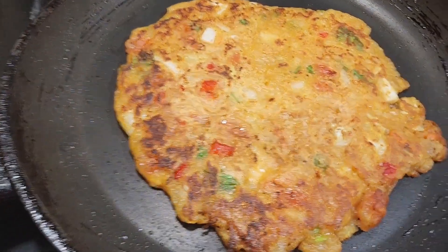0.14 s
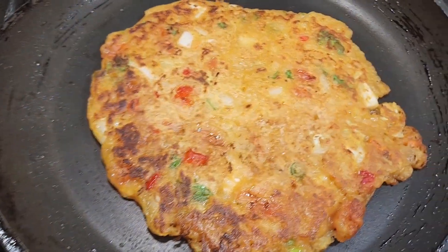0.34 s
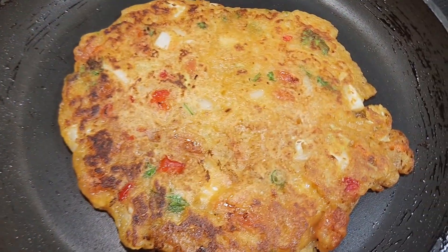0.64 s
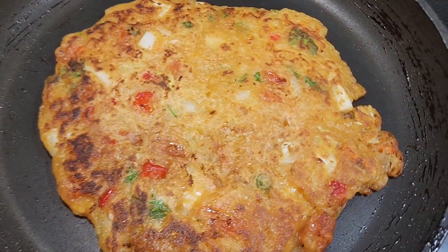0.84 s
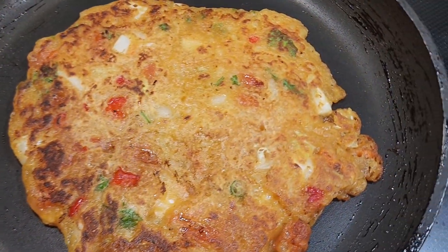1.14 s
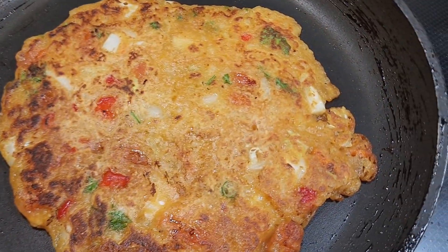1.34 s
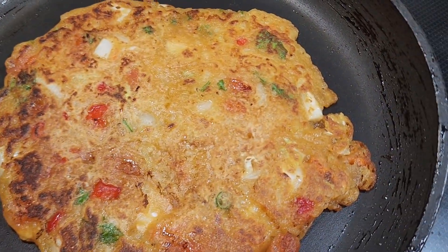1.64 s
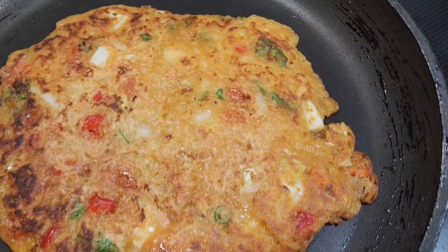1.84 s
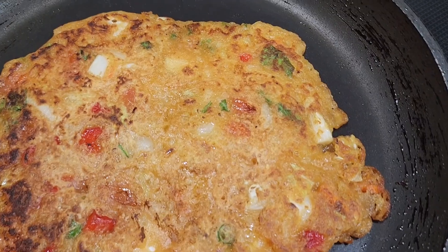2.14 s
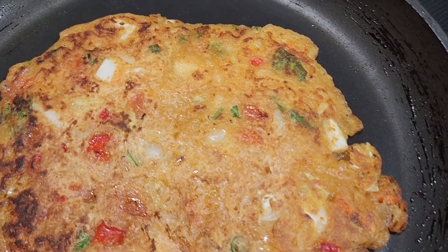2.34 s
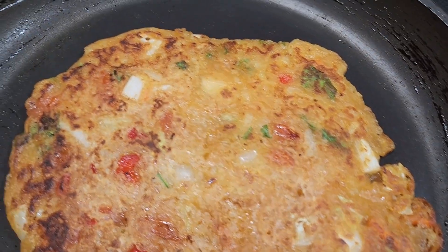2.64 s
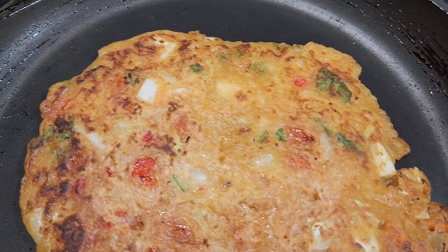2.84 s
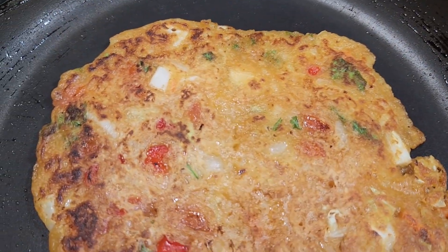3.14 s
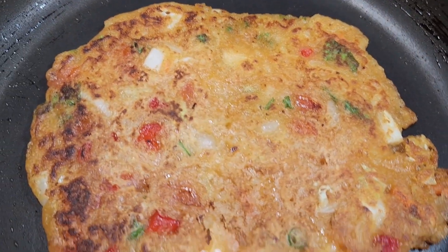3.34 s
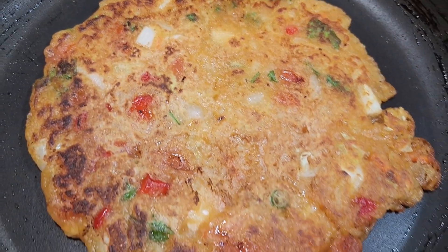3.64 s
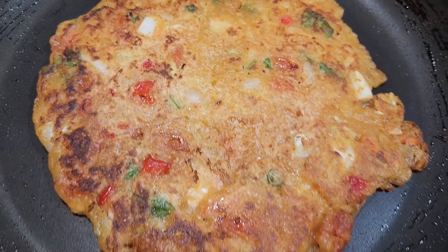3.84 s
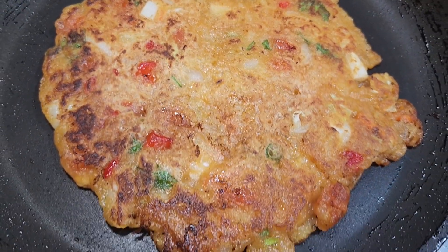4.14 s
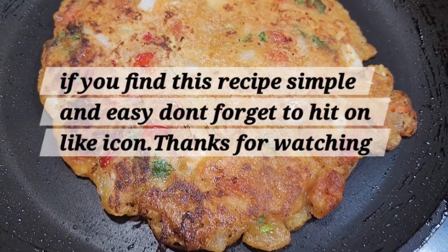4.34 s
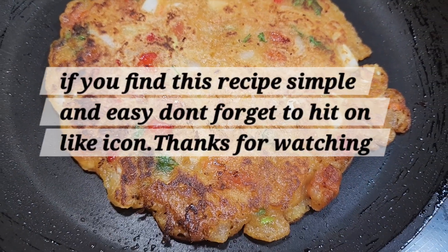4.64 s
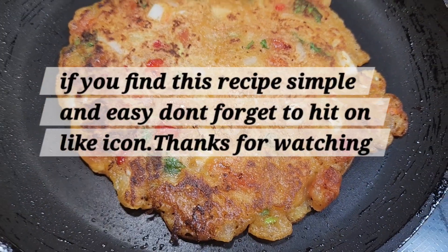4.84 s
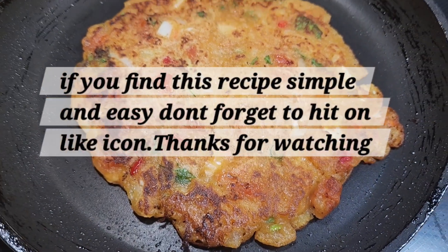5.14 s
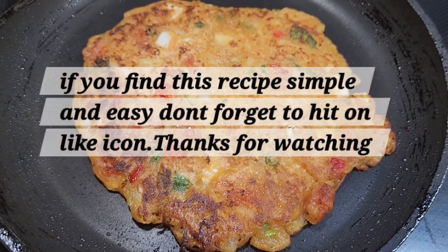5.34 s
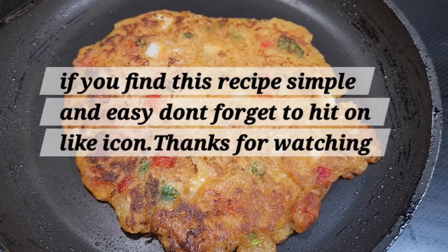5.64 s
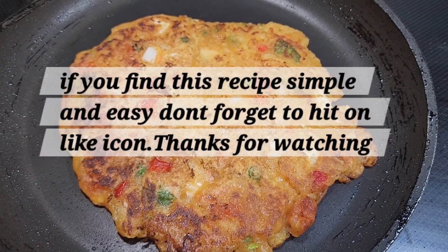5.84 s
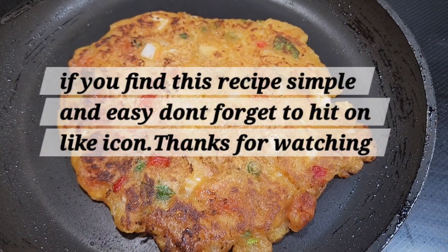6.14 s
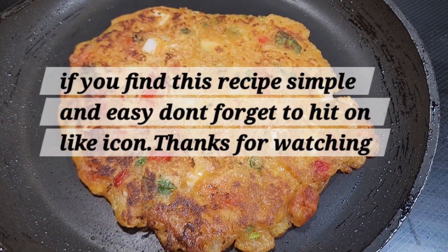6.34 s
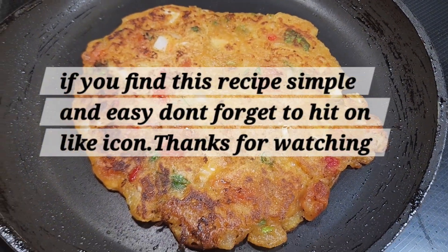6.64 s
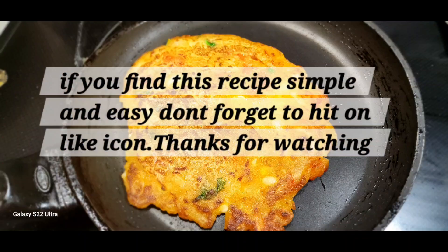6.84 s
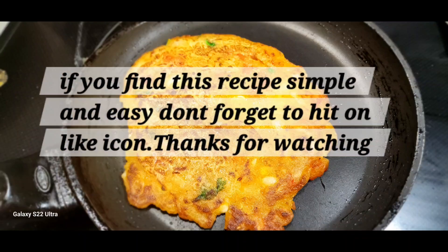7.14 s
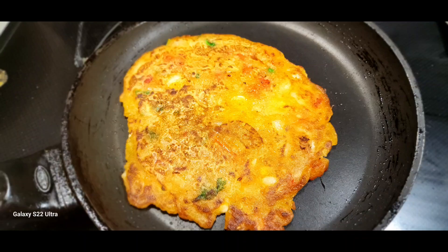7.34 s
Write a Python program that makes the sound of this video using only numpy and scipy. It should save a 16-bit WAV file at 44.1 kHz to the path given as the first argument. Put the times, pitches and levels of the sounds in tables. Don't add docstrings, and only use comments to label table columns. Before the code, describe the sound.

A pancake sizzles softly in a frying pan, an early flurry of sharp crackling pops on the left, over a low extractor fan hum.

```python
import sys
import numpy as np
from scipy import signal
from scipy.fft import rfft, irfft, next_fast_len
from scipy.io import wavfile
from scipy.ndimage import uniform_filter1d, minimum_filter1d, map_coordinates

SR = 44100
rng = np.random.default_rng(int(sys.argv[2]) if len(sys.argv) > 2 else 0)


def field_ratio(decibels):
    return 10 ** (np.asarray(decibels, dtype=float) / 20)


def waveform_to_disk(signal):
    frames = np.transpose(np.atleast_2d(signal))
    scaled = np.clip(frames, -1, 1) * 32767
    samples = np.round(scaled).astype(np.int16)
    wavfile.write(sys.argv[1], SR, samples)


N = 330740

# pitch_hz, level_db, unsteadiness_db
FAN_TONES = [
    (92.7, -36.5, 0.5),
    (120.15, -39.5, 1),
]
# freq_hz, level_db (per Hz)
AIR_RUSH = [(20, -32.5), (35, -13), (60, -9.5), (80, -1), (150, -2.5), (300, -6), (600, -19), (800, -23),
            (1600, -21.5), (2500, -28.5), (5000, -37), (9000, -87.5)]
# centre_hz, width_hz, lift_db
HOOD_MODES = [(178.5, 15, 4), (254, 28, 6), (392, 28, 9), (516, 39, 9), (676.5, 65, 7), (947, 71, 6),
              (1267, 55, 7.5), (1472, 33, 5.5)]
# freq_hz, correlation (no unit)
AIR_LIKENESS = [(60, 1.0), (130, 0.98), (290, 0.97), (640, 0.73), (1410, 0.36), (3100, 0.07), (6820, -1.2),
                (15000, -0.01)]
# freq_hz, left_minus_right_db
AIR_BALANCE = [(60, 3), (110, 0), (200, -0.5), (380, 3), (700, 3), (1290, -2), (2380, 7), (4400, 7.5),
               (8120, -3.5), (15000, 12)]
# start_s, fizz_level_db, small_spits_per_s, left_minus_right_db
FRYING = [(0.0, -47, 5, 1), (0.13, -46, 8.3, 4), (0.24, -42.5, 40.6, 5), (0.46, -41.5, 92, 10.5),
          (0.62, -43, 60, 10), (0.77, -43, 35, 8.5), (1.38, -45, 17, 10.5), (1.67, -43.5, 12, 8),
          (2.5, -45, 14, 7.5), (4.12, -45, 7.15, 6.5), (5.06, -46.5, 7, 5), (5.5, -45, 6, 4),
          (5.75, -43, 4, 0), (5.85, -45.5, 10, 8), (6.38, -44.5, 19.4, 4), (6.6, -45.5, 8, 5.5)]
# freq_hz, level_db (per Hz)
FRYING_COLOUR = [(880, -18), (1500, -6.5), (1620, -0.5), (1770, -9), (2260, -6), (2830, -6), (3270, -5.5),
                 (3710, -4), (5220, -7.5), (7640, -5.5), (9740, -8.5), (11800, -3.5), (15400, -5)]
# freq_hz, left_minus_right_db
PORT_DIFFERENCE = [(1500, 1.5), (2400, 2), (4400, -1), (6000, -2), (7500, -6), (8800, -1), (12000, 1.5),
                   (15000, 3.5)]
# start_s, level_db, t60_s, cavity_hz, opening_kick_db
STEAM_SPURTS = [
    (5.5822, -31.5, 0.26, 2930, 8.5),
    (5.7014, -29.5, 0.14, 3820, 3),
    (5.7135, -32.5, .1, 3650, 3.5),
]
# start_s, bright_db, body_db
RIM_POPS = [(0.1949, -27, -31), (0.2535, -25, -32), (0.261, -14, -29), (0.3122, -30, -28),
            (0.3208, -21, -34), (0.3484, -22, -29), (0.3862, -28, -30), (0.3955, -20, -28),
            (0.4094, -22, -28), (0.4195, -22, -36), (0.4367, -15.5, -31), (0.451, -19, -34),
            (0.46, -21, -31), (0.478, -16, -24.5), (0.4848, -33, -30), (0.4995, -16.5, -24),
            (0.5119, -20, -30), (0.5234, -21, -24), (0.536, -24, -25.5), (0.569, -22, -29),
            (0.5811, -34.5, -26), (0.5984, -16, -23), (0.604, -31, -34), (0.6189, -20, -28),
            (0.645, -28, -28.5), (0.659, -24.5, -42), (0.681, -27, -30),
            (0.8186, -21, -26.5), (0.8503, -29.5, -31), (0.907, -15, -20), (0.923, -19, -25),
                  (1.0273, -29, -30), (1.066, -22, -32), (1.179, -23, -24.5), (1.2016, -39, -31),
                  (1.2253, -42, -30), (1.2606, -15.5, -18.5), (1.2823, -25, -37), (1.339, -32, -34),
                  (1.3568, -19, -32), (1.37, -29.5, -31), (1.3772, -32, -33), (1.617, -24, -29.5),
                  (2.111, -34.5, -29), (2.1268, -39, -31), (2.2646, -34, -31), (2.2744, -24.5, -36),
                  (2.4565, -27, -32), (2.6618, -32, -37), (2.8216, -27, -28.5), (2.873, -30, -32),
                  (2.949, -22, -28), (3.1086, -18.5, -28.5), (3.717, -24, -28.5), (5.1662, -26, -34),
                  (5.3107, -22.5, -44), (6.271, -28, -45)]
# start_s, bright_db, body_db, cavity_hz
BELOW_POPS = [(1.596, -48, -37, 2198), (2.1712, -34, -34, 4200), (2.336, -30, -28, 5500),
              (2.6009, -28.5, -31, 4197), (4.69, -30, -37, 2400), (4.8424, -33, -32, 4490),
              (4.948, -30, -38, 2398), (5.3781, -22.5, -37, 3202), (5.5544, -26, -27.5, 2600),
              (5.6371, -22, -15, 1994), (5.6481, -21.5, -25, 2984), (5.8418, -30, -42, 4890),
              (5.851, -38, -34.5, 2904), (5.896, -32, -28, 4200), (6.018, -39, -31, 3800),
              (6.0452, -22.5, -28.5, 4000), (6.322, -33, -30.5, 3900), (6.358, -32.5, -40.5, 2500),
              (6.445, -33, -29, 3000), (6.5664, -35.5, -36.5, 2100), (6.5973, -36, -38, 3400),
              (6.7648, -25, -27, 2505)]
SIDES = np.array([[.5], [-.5]])
# freq_hz, margin_db
LEFT_DROPOUT = [(1500, 40), (2500, 8), (4000, 4.8), (5300, 3.5), (7000, 4.3), (9000, 7), (15540, 9),
                (15590, -5)]
# freq_hz, margin_db
RIGHT_DROPOUT = [(1500, 40), (2500, 5), (4000, 3.4), (7500, 4.2), (8800, 2.2), (10000, 3.8), (15540, 5.5),
                 (15590, -5)]
# freq_hz, gain_db
BAND_LIMIT = [(15450, 0), (15560, -3), (15850, -6), (15950, -13), (16700, -21), (16800, -70)]

FAN_DB = -36
CRACKLE_DB, CRACKLE_SWAY_DB = -1, 3.5
SPIT_DB, SPIT_SPREAD_DB = 4, 2
SPIT_DULL_DB, SPIT_COLOUR_DB = 3, 3
RIM_PAN_DB, RIM_CAVITY_HZ = 17.5, 4160
BELOW_PAN_DB, SPURT_PAN_DB = 1.5, -1.5
PLACE_DB, CAVITY_SCATTER = 1.5, 0.063
GAP_S, GAP_ECHO = .00052, .36
CUT_S = 6.7845


def unit(x):
    return x / np.sqrt(np.mean(x ** 2) + 1e-20)


def along(points, hz):
    f, v = np.transpose(points)
    return np.interp(np.log(hz + 1), np.log(f + 1), v)


def curves(rows):
    s, *cols = np.transpose(rows)
    return [np.interp(np.arange(N) / SR, s, c) for c in cols]


def wobble(rate):
    knots = rng.standard_normal(int(N * rate / SR) + 4)
    return map_coordinates(knots, [np.arange(N) * rate / SR])


def filtered(x, response):
    m = next_fast_len(N + SR // 2)
    return irfft(rfft(x, m) * response(np.fft.rfftfreq(m, 1 / SR)), m)[..., :N]


def ring(hz, centre_hz, width_hz):
    return 1j * hz * width_hz / (centre_hz ** 2 - hz ** 2 + 1j * hz * width_hz)


def fan():
    t = np.arange(N) / SR
    tones = 0
    for hz, db, sway_db in FAN_TONES:
        level = np.sqrt(2) * field_ratio(db + sway_db * wobble(4))
        tones = tones + level * np.sin(2 * np.pi * hz * t + .5 * wobble(3))

    def mid_side(hz):
        lift = 1 + sum((field_ratio(db) - 1) * abs(ring(hz, c, w)) ** 2 for c, w, db in HOOD_MODES)
        angle = np.arccos(np.clip(along(AIR_LIKENESS, hz), -1, 1)) / 2
        return field_ratio(along(AIR_RUSH, hz)) * lift * [np.cos(angle), np.sin(angle)]

    mid, side = filtered(rng.standard_normal((2, N)), mid_side)
    air = filtered(np.array([mid + side, mid - side]), lambda hz: field_ratio(SIDES * along(AIR_BALANCE, hz)))
    return tones + field_ratio(FAN_DB + .6 * wobble(6)) * unit(air)


def kitchen(x):
    t = np.arange(SR // 8) / SR
    tail = rng.standard_normal((2, len(t))) * field_ratio(-60 * t / 0.14)
    late = np.pad(x, (70, 0))[None]
    return signal.fftconvolve(late, tail / np.linalg.norm(tail[0]), axes=1)[:, :N]


def burst(life_s):
    u = np.arange(SR // 100) / SR / life_s
    return u * np.exp(1 - u)


def ports(x):
    return filtered(x, lambda hz: field_ratio(along(FRYING_COLOUR, hz) + SIDES * along(PORT_DIFFERENCE, hz)))


def bubbles(rate, spread_db, clump_db, life_s, echo):
    chance = rate / SR * field_ratio(clump_db * wobble(11))
    burst_db = spread_db * np.minimum(rng.exponential(size=N), 3.5)
    sizes = (rng.random(N) < chance) * field_ratio(burst_db)
    near = signal.fftconvolve(sizes, burst(life_s))[:N]
    far = near + echo * signal.fftconvolve(sizes, burst(life_s * 8))[:N]
    return unit(ports(np.array([unit(near), unit(far)]) * rng.standard_normal((2, N))))


def sizzle():
    fizz_db, _, pan_db = curves(FRYING)
    crackle_db = fizz_db + CRACKLE_DB + CRACKLE_SWAY_DB * wobble(5)
    fizz = bubbles(rate=3200, spread_db=1.8, clump_db=.4, life_s=.0003, echo=3)
    crackle = bubbles(rate=290, spread_db=1.6, clump_db=2.5, life_s=0.00043, echo=2.7)
    fizz = field_ratio(fizz_db + 2.0 + SIDES * pan_db) * fizz
    return fizz + field_ratio(crackle_db - 5.5 + 0.32 * SIDES * pan_db) * crackle


def spurts():
    out, t = np.zeros((2, N)), np.arange(N) / SR
    for s, db, t60, cavity_hz, kick_db in STEAM_SPURTS:
        turn = np.sign(np.cos(2 * np.pi * cavity_hz * GAP_S))

        def hiss(hz):
            floor_echo = 1 / (1 - turn * GAP_ECHO * np.exp(-2j * np.pi * hz * GAP_S))
            whistle = .9 * ring(hz, cavity_hz, 2400) ** 2
            rush = ring(hz, 7000, 22000) * ring(hz, 8000, 26000)
            return (whistle + rush) * floor_echo

        jet = unit(filtered(rng.standard_normal((2, N)), hiss))
        age = np.maximum(t - s, 0)
        fall_db = kick_db * np.exp(-age / .011) - 60 * age / t60
        out += (t > s) * field_ratio(db + SIDES * SPURT_PAN_DB + fall_db + 2.5 * wobble(400)) * jet
    return out


def spits():
    fizz_db, rate, pan_db = curves(FRYING)
    luck = rng.random((400, 2))
    at = np.searchsorted(np.cumsum(np.maximum(rate, 0)) / SR, np.cumsum(.5 + luck[:, 0]))
    size_db = SPIT_SPREAD_DB * np.minimum(-np.log(1 - luck[:, 1]), 2)
    colour_db = SPIT_COLOUR_DB * rng.standard_normal(len(at))
    rows = [(*r, RIM_PAN_DB, RIM_CAVITY_HZ) for r in RIM_POPS]
    rows += [(*r[:3], BELOW_PAN_DB, r[3]) for r in BELOW_POPS]
    for i, size, colour in zip(at, size_db, colour_db):
        if i < N:
            db = fizz_db[i] + SPIT_DB + size
            rows.append((i / SR, db + colour, db - colour - SPIT_DULL_DB, pan_db[i] + 8.5, RIM_CAVITY_HZ))
    rows = np.array(rows)
    scatter = rng.standard_normal((500, 2))[:len(rows)]
    rows[:, 3] += PLACE_DB * scatter[:, 0]
    rows[:, 4] *= np.exp(CAVITY_SCATTER * scatter[:, 1])
    return rows


def pops():
    out, size = np.zeros((2, N + SR)), SR // 100
    hz = np.fft.rfftfreq(size, 1 / SR)
    left_port = ring(hz, 13200, 5500)
    right_port = ring(hz, 7400, 3500) + .4 * ring(hz, 13000, 6000)
    port = np.array([left_port, right_port]) * ring(hz, 10000, 14000)
    low_cut = 1 / (1 + 1050 / (1j * hz + 1)) ** 2
    noises = rng.standard_normal((500, 4, size))
    for (s, bright_db, body_db, pan_db, cavity_hz), g in zip(spits(), noises):
        shaded_s = 0.00038 * (0.5 + 0.34 * max(pan_db - 0.5, 0))
        spray = 0.069 * burst(0.0017)
        shape = np.array([burst(0.00042), burst(shaded_s)]) + spray
        snap = 3.8 * np.exp(-2j * np.pi * hz * 0.000404) * field_ratio([[0], [-.8 * max(pan_db, 0)]])
        bright = irfft((rfft(shape * g[:2]) + snap) * port, size)
        body = irfft((rfft(shape * g[2:]) + snap) * ring(hz, cavity_hz, 5500) * low_cut, size)
        both = field_ratio(bright_db - 14.5) * np.array([unit(v) for v in bright])
        both = both + field_ratio(body_db - 8.5) * np.array([unit(v) for v in body])
        out[:, round((s - .0005) * SR):][:, :size] += both * field_ratio([[0], [-pan_db]])
    return out[:, :N]


def scene():
    loud = pops() + spurts()
    return loud + field_ratio(-5) * kitchen(loud.mean(0)) + sizzle() + fan()


def thinned(x):
    hz, _, z = signal.stft(x, SR, nperseg=1024, noverlap=768)
    power = uniform_filter1d(abs(z) ** 2, size=4, axis=1)
    power = uniform_filter1d(power, size=5, axis=2)
    band_db = 10 * np.log10(abs(power) + 1e-20)
    usual_db = uniform_filter1d(band_db, size=24, axis=1)
    top = hz > 15560
    usual_db[:, top] = uniform_filter1d(usual_db[:, top], size=80, axis=2)
    margin_db = np.array([along(LEFT_DROPOUT, hz), along(RIGHT_DROPOUT, hz)])[..., None]
    kept = 1. * (band_db > usual_db - margin_db)
    kept = minimum_filter1d(minimum_filter1d(kept, size=4, axis=1), size=5, axis=2)
    return signal.istft(z * kept, SR, nperseg=1024, noverlap=768)[1][:, :N]


def band_limit(x):
    return signal.sosfilt(signal.butter(12, 16810, fs=SR, output="sos"), x)


def record(dry):
    phone = filtered(thinned(dry), lambda hz: field_ratio(along(BAND_LIMIT, hz)))
    fade = np.clip((CUT_S - np.arange(N) / SR) / 0.0042, 0, 1)
    return band_limit(phone * fade)


dry = scene()
out = record(dry)
waveform_to_disk(out)
```